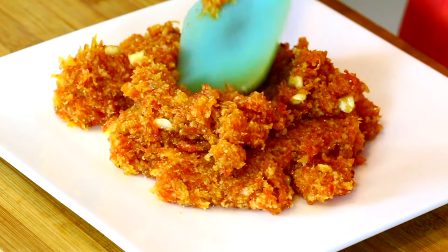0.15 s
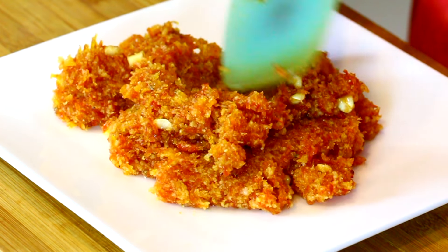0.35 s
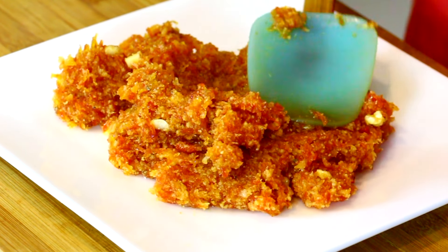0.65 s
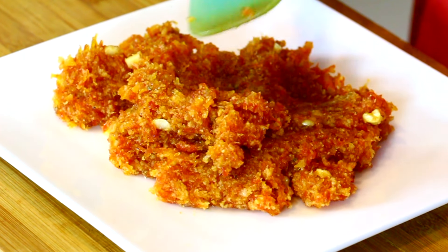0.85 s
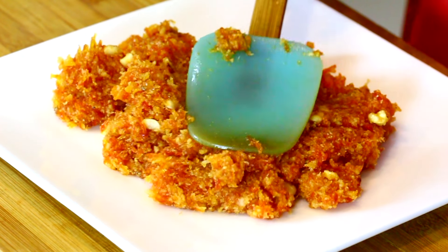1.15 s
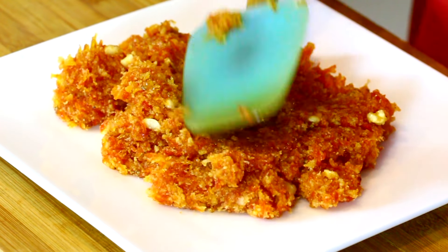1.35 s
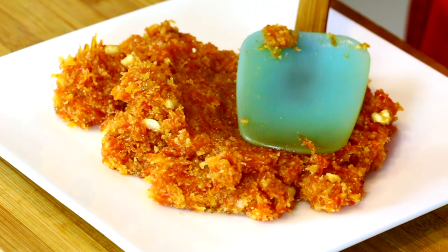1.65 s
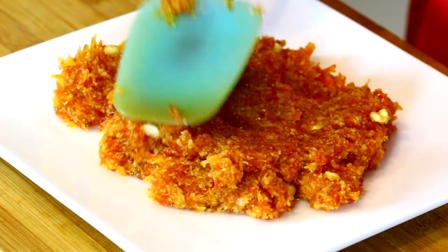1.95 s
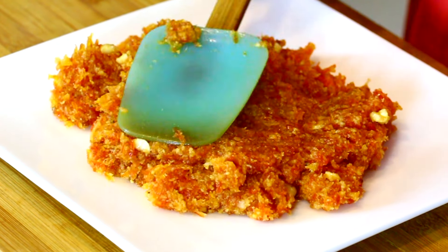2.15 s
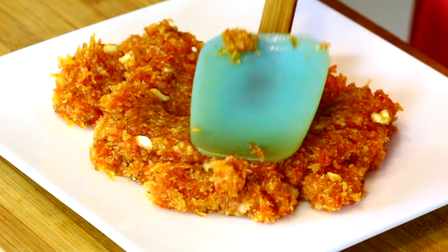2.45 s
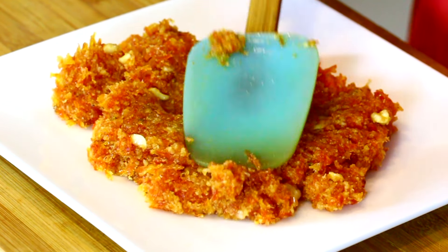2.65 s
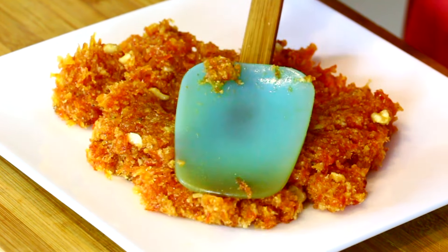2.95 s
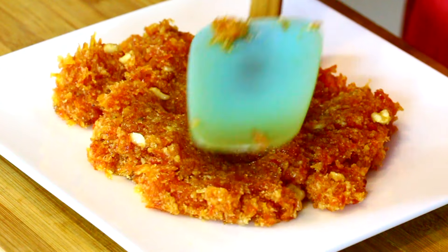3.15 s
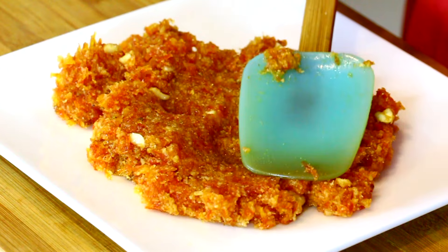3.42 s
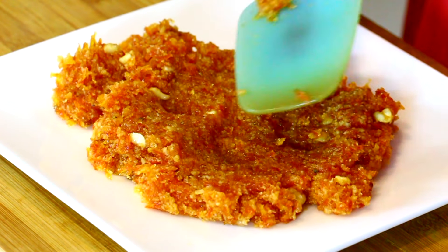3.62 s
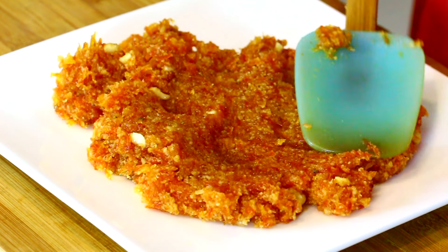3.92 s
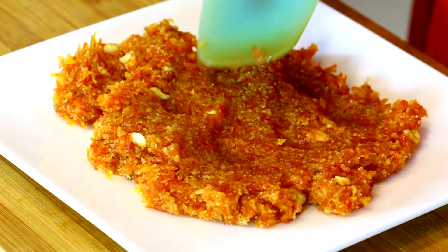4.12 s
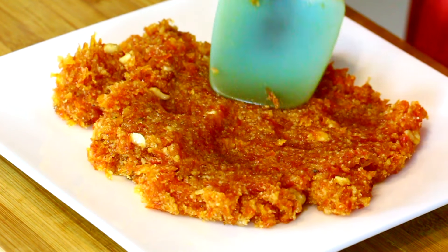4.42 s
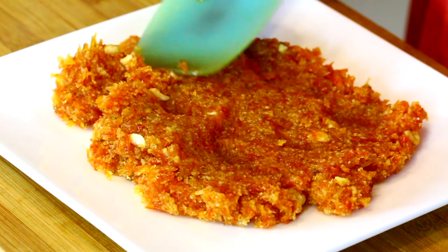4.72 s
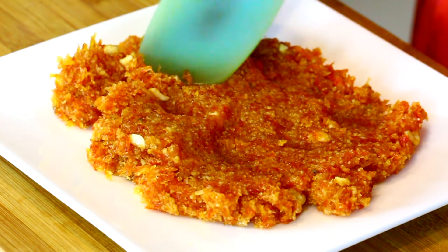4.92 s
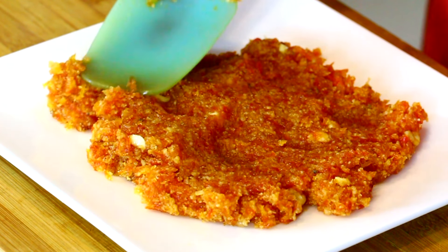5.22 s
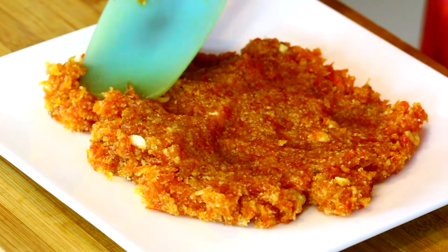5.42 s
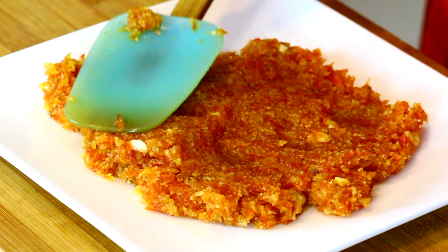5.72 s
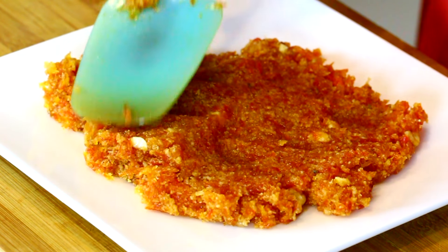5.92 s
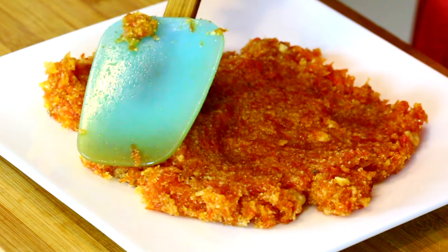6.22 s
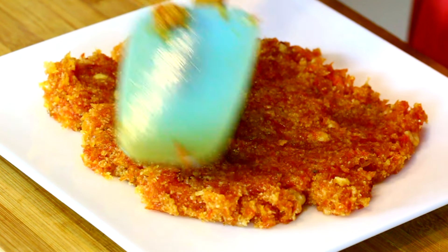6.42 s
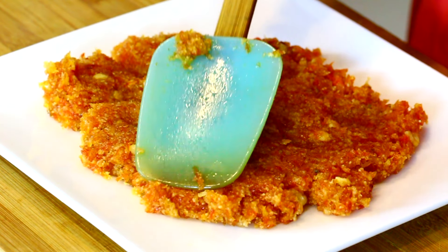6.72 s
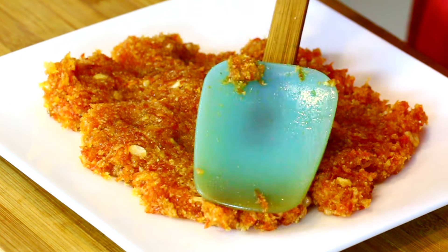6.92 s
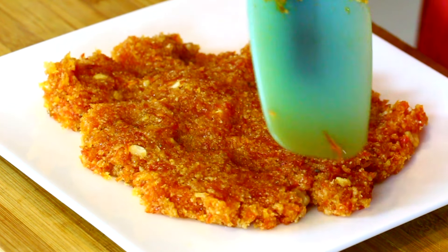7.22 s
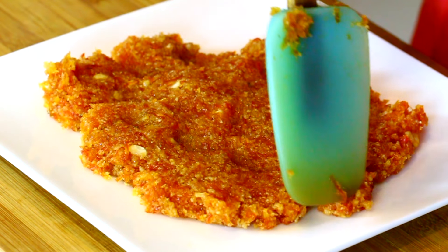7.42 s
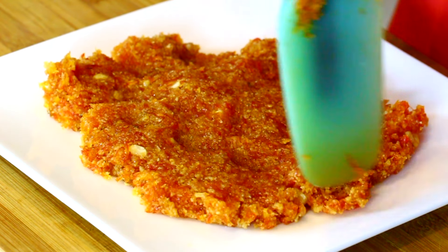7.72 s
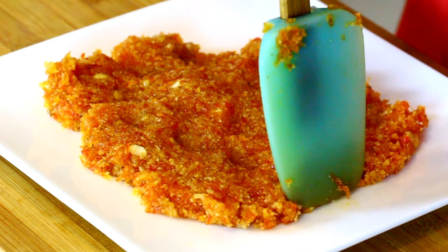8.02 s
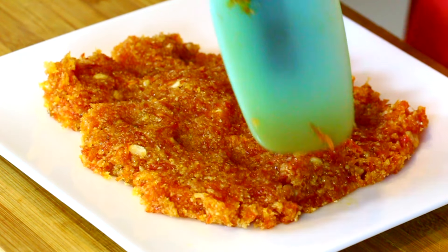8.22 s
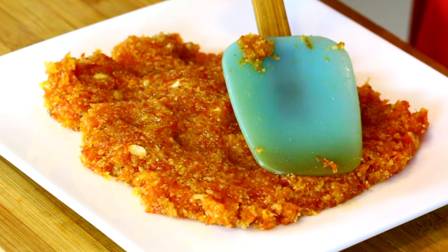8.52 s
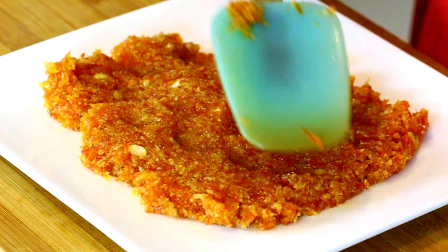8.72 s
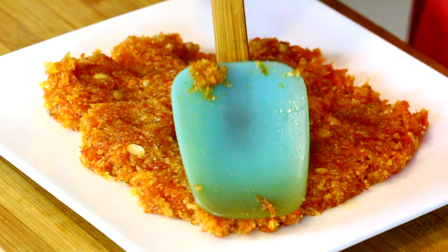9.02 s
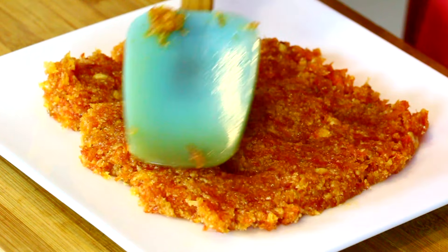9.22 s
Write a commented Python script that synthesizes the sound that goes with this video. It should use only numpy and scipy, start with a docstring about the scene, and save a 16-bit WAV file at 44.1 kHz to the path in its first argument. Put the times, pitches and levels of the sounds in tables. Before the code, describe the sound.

Close up in a small, quiet kitchen, a brief metallic rattle opens, with a faint tone fading after it. A soft blade thumps a plate of tacky food, hollow and short, and peels away with high crackling and popping strands. The strongest knocks come around two to three seconds and at seven. A faint rub precedes a late knock, and crisp snaps finish over steady low room hum.

```python
"""Spatula patting a sticky mixture on a plate

A silicone spatula pats and spreads a sticky mixture on a ceramic plate that rests on a wooden counter.
Its thuds ring damped plate modes over a noisy board shudder; the peeling blade crackles and snaps in tiny pops.
A metal utensil clatters down nearby at the start, as damped modes and bursts of coloured noise.
Faint tones ring and the blade rubs once; a quiet kitchen hums and echoes around a nearly mono image."""
import sys
import numpy as np
from scipy import signal
from scipy.fft import rfft, irfft, next_fast_len
from scipy.io import wavfile
from scipy.ndimage import map_coordinates

SR = 44100
rng = np.random.default_rng(int(sys.argv[2]) if len(sys.argv) > 2 else 0)


def dump_mix(stems):
    """Bounce the given channels to the path in sys.argv[1] as a 16-bit WAV at rate SR."""
    frames = np.atleast_2d(stems).T  # one column per channel
    limited = np.clip(frames, -1, 1)  # hard clip at full scale
    pcm = np.round(limited * 32767).astype(np.int16)
    wavfile.write(sys.argv[1], SR, pcm)


N = 412776

# single sticky strands that snap, loud ones and some faint ones: (t/s, peak level/dB, f/Hz)
SNAPS = [(0.2854, -28, 5500), (0.2907, -30, 4860), (0.5976, -31, 6500), (0.6733, -33, 7400),
         (0.761, -33.5, 5280), (0.827, -32.5, 5300), (0.8647, -28.5, 7600), (1.1785, -29, 5900),
         (1.4981, -26, 7000), (1.5075, -22, 9000), (1.5278, -27.5, 7000), (1.5327, -23, 10200),
         (2.4096, -27, 5540), (2.4125, -23, 5640), (2.4304, -29, 5200), (2.621, -35, 7600),
         (2.8204, -23, 7600), (2.8243, -27, 8850), (2.8454, -25, 6910), (2.8566, -24, 7110),
         (2.863, -30, 5690), (2.875, -28, 7480), (2.883, -18, 6870), (3.2464, -33, 7660),
         (3.2759, -25.5, 7300), (3.288, -18.5, 6600), (3.518, -31.5, 4770), (3.7165, -20.5, 7450),
         (3.9887, -37, 4900), (4.101, -32, 7300), (4.128, -36, 4130), (4.3428, -34, 7800),
         (4.4414, -39, 2800), (4.592, -27.5, 5270), (4.6112, -25, 5660), (4.6187, -27, 9460),
         (5.0097, -37, 5500), (5.091, -34, 2710), (5.5822, -37, 2700), (5.6125, -32, 5600),
         (5.8786, -35.5, 7340), (5.9115, -30, 7660), (6.0304, -27.5, 6900), (6.094, -29, 8100),
         (6.3053, -37, 6020), (6.4875, -30.5, 7600), (6.8986, -31, 9300), (6.9157, -29, 9860),
         (7.1816, -32, 6900), (7.1878, -30, 7540), (8.1671, -41, 3500), (8.632, -34, 7400),
         (8.68, -38, 2800), (8.8199, -31.5, 7400), (9.207, -34, 10000), (9.246, -21, 8200),
         (9.2481, -18, 7700)]


def amp(db):
    """dB to gain."""
    return 10 ** (np.asarray(db) / 20)


def unit(x):
    """Scaled to rms 1."""
    return x / np.sqrt(np.mean(x ** 2) + 1e-20)


def along(points, hz):
    """Reads a curve of (f/Hz, value) points on a log frequency axis."""
    f, v = np.transpose(points)
    return np.interp(np.log(hz + 1), np.log(f + 1), v)


def wobble(rate):
    """A smooth random curve, rate knots a second."""
    knots = rng.standard_normal(int(N * rate / SR) + 4)
    return map_coordinates(knots, [np.arange(N) * rate / SR])


def coloured(x, spectrum):
    """Filters x to a (f/Hz, level/dB) spectrum without lead-in (minimum phase)."""
    m = next_fast_len(len(x) + 8192)
    gain = amp(along(spectrum, np.fft.rfftfreq(4096, 1 / SR)))
    # folding the cepstrum onto positive time gives minimum phase
    cepstrum = irfft(np.log(gain + 1e-6))
    cepstrum[1:2048] *= 2
    cepstrum[2049:] = 0
    impulse = irfft(np.exp(rfft(cepstrum)))
    return irfft(rfft(x, m) * rfft(impulse, m), m)[:len(x)]


def add(track, s, sound):
    """Mixes a sound into the track at time s."""
    part = track[round(s * SR):][:len(sound)]
    part += sound[:len(part)]


def ringing(modes, t, scatter_db, detune):
    """Damped modes, each at a new strength and slightly off pitch; neighbours swing in opposite senses."""
    hz, db, t60 = np.transpose(modes)[:, :, None]
    level_chance, pitch_chance = rng.standard_normal((2, *hz.shape))
    strength = amp(db + scatter_db * level_chance - 60 * t / t60)
    sense = (-1) ** np.arange(len(modes))[:, None]
    swing = np.sin(2 * np.pi * hz * (1 + detune * pitch_chance) * t)
    return np.sum(sense * strength * swing, axis=0)


def clicks(s, gain, hz, cycles):
    """Tiny pops whose envelopes peak at times s: a few cycles that swell and die."""
    t = np.arange(80) / SR
    u = t * hz[:, None] / cycles
    pop = gain[:, None] * u * np.exp(1 - u) * np.sin(2 * np.pi * hz[:, None] * t)
    where = np.round((s - cycles / hz) * SR).astype(int)[:, None] + np.arange(len(t))
    # overlapping pops add up; the spare last bin takes what falls past the end
    return np.bincount(np.clip(where, 0, N).ravel(), pop.ravel(), N + 1)[:N]


def puff(t):
    """One slow swing of squeezed air."""
    swing = t / 0.0065
    return np.sin(swing * 1.74) * swing * np.exp(1 - swing)


def room_tone():
    """Steady hum and hiss, drifting a little."""
    # colour of the tone: (f/Hz, relative level per Hz/dB)
    hum = [(12, -31), (20, -16), (85, 2.5), (197, 0), (618, -5), (3900, -19), (7830, -23), (14500, -29),
           (15700, -34)]
    drift = amp(0.51 * wobble(1.0) + 0.17 * wobble(8.6))
    return amp(-53.5) * drift * unit(coloured(rng.standard_normal(N), hum))


def side_hiss():
    """Faint steady noise, the only difference between the channels."""
    # its colour: (f/Hz, relative level per Hz/dB)
    wide = [(12, -30), (20, 1), (141, -3.5), (1470, -27.5), (4870, -23.5), (15700, -15)]
    return amp(-73) * unit(coloured(rng.standard_normal(N), wide))


def peeling():
    """Tiny strands tear in clumps over a wet hiss; brisker peels tear thinner, higher strands."""
    # the blade peels off the mixture: (middle t/s, crackle level/dB, half length/s)
    peels = [(0.3, -52, 0.035), (0.665, -57, 0.064), (0.875, -51, 0.037), (1.194, -57, 0.049),
             (1.503, -46.5, 0.031), (1.905, -51, 0.028), (2.143, -56.5, 0.02), (2.213, -55.5, 0.022),
             (2.417, -45.5, 0.03), (2.632, -58, 0.014), (2.855, -46.5, 0.041), (3.113, -59.5, 0.021),
             (3.291, -45.5, 0.014), (3.49, -61, 0.053), (3.693, -49, 0.021), (3.961, -57, 0.036),
             (4.123, -49.5, 0.021), (4.352, -48.5, 0.01), (4.44, -56.5, 0.02), (4.6, -49, 0.031),
             (4.9, -60, 0.074), (5.112, -53.5, 0.037), (5.585, -55, 0.05), (5.89, -61, 0.031),
             (6.077, -53, 0.016), (6.485, -56.5, 0.021), (6.918, -55, 0.027), (7.191, -56, 0.025),
             (8.841, -50, 0.027), (9.256, -50, 0.017)]
    # colour of the hiss: (f/Hz, relative level per Hz/dB)
    crackle = [(1180, -44), (2000, -16), (2680, -6), (3950, -20), (7230, -7.5), (10600, -13), (15700, -27)]
    rest_db = -65.5  # a faint crackle never quite stops between peels
    rest_hz, brighter_per_db = 5400, .022  # its middle grain pitch, log pitch rise per dB of peel

    t = np.arange(N) / SR
    level = amp(rest_db)
    for s, db, half in peels:
        level = level + amp(db) * np.exp(-np.abs((t - s) / half) ** 1.67)

    density = 1100 / SR * amp(5 * wobble(70))  # chance of a tear per sample, in clumps
    when = np.flatnonzero(rng.random(N) < density)
    size = amp(-3 * np.log(rng.random(N)[when]))
    brisk_db = 20 * np.log10(level[when]) - rest_db
    pitch_hz = rest_hz * np.exp(brighter_per_db * brisk_db + 0.42 * rng.standard_normal(N)[when])
    pitch_hz = np.clip(pitch_hz, 2400, 12500)
    # thick, low strands ring longer, so they start weaker
    grains = clicks(when / SR, size * (pitch_hz / 7000) ** .45, pitch_hz, cycles=1.25)
    hiss = coloured(rng.standard_normal(N) * amp(5.1 * wobble(90)), crackle)
    return level * unit(unit(grains) + 0.55 * unit(hiss))


def clatter():
    """The utensil bounces to rest: each scraping contact rings the metal and leaves a dull rattle."""
    # bounces: (t/s, relative level/dB, ring against rattle/dB)
    bounces = [(0.0005, -10.5, -0.5), (0.0205, -18, 0.5), (0.0519, -11.5, 3.5), (0.0935, -13.5, 1.5),
               (0.0978, -13, 6), (0.1182, -15.5, 0.5), (0.2849, -33.5, -2.5)]
    # modes of the utensil before detuning: (f/Hz, relative level/dB, t60/s)
    metal = [(599.7, -1, 0.14), (801, -7.5, 0.43), (1075, -7, .08), (1613, 0, 0.048), (2124, -18, 0.49),
             (2590, -7, 0.032), (2993, 1.5, 0.036), (3710, 3.5, 0.023), (4490, -2, 0.023),
             (5260, -4.5, 0.037), (6530, -9, 0.032), (7450, -3.5, 0.031), (8080, -1, .03)]
    # colour of the rattle: (f/Hz, level per Hz/dB)
    rattle_colour = [(24, -63), (40, -16), (77, -17), (267, -22), (499, -12), (823, -4.5), (1320, -9),
                     (3880, -16), (9780, -29), (15700, -49)]

    out, bursts, t = np.zeros(N), np.zeros(N), np.arange(SR // 2) / SR
    for s, db, ring_db in bounces:
        contact = amp(-60 * t[:600] / 0.0051) * rng.standard_normal(600)
        modes = ringing(metal, t, scatter_db=3.0, detune=.03)
        ring = signal.fftconvolve(modes, contact / np.linalg.norm(contact))
        add(out, s, amp(db + ring_db - 13.5) * ring)
        # a quick decay with a weaker, slower one behind it
        dying = amp(-60 * t / 0.018) + 0.28 * amp(-60 * t / 0.39)
        attack = 1 - np.exp(-t / 0.0011)
        add(bursts, s, amp(db) * attack * dying * rng.standard_normal(len(t)))
    rattle = coloured(bursts * amp(1.3 * wobble(165)), rattle_colour)
    return out + amp(16) * rattle


def room(x, step=.4):
    """The kitchen's tail: each frequency dies at its own speed, each step of seconds meets a new tail."""
    # decay of the kitchen: (f/Hz, t60/s)
    kitchen = [(100, 0.81), (500, 0.33), (2000, 0.45), (5000, 0.36), (12000, 0.18)]
    out, size = np.zeros(N), round(step * SR)
    for start in range(0, N, size):
        hz, t, z = signal.stft(rng.standard_normal(SR * 3 // 4), SR, nperseg=256)
        decay = amp(-60 * t / along(kitchen, hz)[:, None])
        tail = signal.istft(z * decay, SR, nperseg=256)[1]
        echo = signal.fftconvolve(x[start:start + size], tail / np.linalg.norm(tail))
        add(out, start / SR + .003, echo)
    return out


def snaps():
    """Each strand lets go in a pop with a lower partial, and a weaker twin comes off the plate."""
    s, db, hz = np.transpose(SNAPS)
    pop = clicks(s, amp(db), hz, cycles=0.87)
    low = clicks(s, amp(db - 28.0), 0.43 * hz, cycles=0.88)
    twin = clicks(s + 0.00077, amp(db - 17.0), 1.03 * hz, cycles=1.6)
    return pop + low + twin


def suction():
    """Air rushes in behind every snapping strand: a low puff of inverted sign."""
    out, t = np.zeros(N), np.arange(SR // 10) / SR
    for s, db, hz in SNAPS:
        add(out, s, -amp(db - 32) * puff(t))
    return out


def pings():
    """Single soft tones that swell and fade, wavering in strength and phase."""
    # faint rings from elsewhere in the kitchen: (t/s, level before swell and waver/dB, f/Hz, t60/s, attack/s)
    tones = [(0.354, -36.5, 675, .34, .001), (0.76, -54, 2140, 1.3, .12)]
    out, t = np.zeros(N), np.arange(SR) / SR
    for s, db, hz, t60, attack in tones:
        waver_db, phase_drift = 5 * wobble(60)[:SR], .7 * wobble(45)[:SR]
        swell = 1 - np.exp(-t / attack)
        tone = np.sin(2 * np.pi * hz * t + phase_drift)
        add(out, s, amp(db + waver_db - 60 * t / t60) * swell * tone)
    return out


def thuds():
    """The blade rings the plate: the harder the thud, the shorter its contact and the brighter its sound."""
    # thuds of the blade as it pats the plate or peels away: (t/s, peak level/dB, hardness/dB)
    blade_thuds = [(0.636, -32.5, -19), (1.239, -46.5, -15), (1.484, -28.5, -8.5), (1.76, -23, -10.5),
                   (1.897, -26.5, -4), (2.424, -18, -10.5), (2.634, -24, -7), (2.855, -36.5, 0),
                   (3.041, -17.5, -1.5), (3.259, -36, 0), (3.466, -26, -7.5), (3.71, -37.5, -2),
                   (5.557, -23, -13.5), (5.951, -35, -22), (6.637, -33, -9), (7.05, -19, -1),
                   (8.058, -25, -1), (8.586, -37, -15), (9.031, -31.5, -7)]
    # modes of the plate on its board before detuning: (f/Hz, relative level/dB, t60/s)
    plate = [(109, -3.5, 0.25), (213, -13.5, 0.11), (327, -2.5, 0.15), (360, -7, 0.15), (409, 9, 0.052),
             (518.5, 0.5, 0.12), (576.5, 2.5, 0.14), (691, -2, 0.1), (798, 11, 0.043), (954, 1.5, 0.056),
             (981, -0.5, 0.14), (1144, 6, 0.049), (1302, -2.5, 0.064), (1530, 1.5, 0.037),
             (1893, -4, 0.055), (2190, -1.5, 0.068), (2210, -12, 0.036), (2470, 4.5, 0.033),
             (3160, -7, 0.036)]
    push_db, push_grows = -37, .6  # air push with a 0 dB thud, its dB per dB of thud
    thud_lag_s = 0.00149  # delay of the thud behind the push

    out, t = np.zeros(N), np.arange(SR // 3) / SR
    # no deep bass from a small plate, no treble from a soft blade
    band = signal.butter(3, [200, 3300], "band", fs=SR)
    for s, db, hard_db in blade_thuds:
        contact_s = 0.00047 * amp(-.7 * hard_db)
        u = t[:900] / contact_s
        force = u * np.exp(-4 * u)
        # the board under the plate adds a dense shudder between the modes
        shudder = amp(14.5) * amp(-60 * t / 0.065) * rng.standard_normal(len(t))
        modes = ringing(plate, t, scatter_db=2.0, detune=0.013)
        thud = signal.lfilter(*band, signal.fftconvolve(modes + shudder, force))
        add(out, s + thud_lag_s, amp(db) * thud / np.abs(thud).max())
        add(out, s, amp(push_db + push_grows * db) * puff(t))  # air pushed by the blade
    return out


def rub():
    """The blade's edge slides briefly along the plate: a swell of fluttering coloured noise."""
    # colour of the rub: (f/Hz, relative level per Hz/dB)
    rub_colour = [(600, -30), (900, 2), (1150, -8), (1600, -3), (2300, -25)]
    middle_s, half_s = 7.92, 0.086
    stroke = np.exp(-((np.arange(N) / SR - middle_s) / half_s) ** 4)
    flutter = rng.standard_normal(N) * amp(3 * wobble(60))
    noise = coloured(flutter, [(20, -90), *rub_colour, (9000, -90)])
    return amp(-59.5) * stroke * unit(noise)


def scene():
    """All sources arrive alike at both channels; only a faint hiss differs."""
    plate_hits, metal_hits = thuds(), clatter()
    sticky = snaps() + peeling()
    room_send = amp(-6.0) * plate_hits + amp(-13.5) * sticky + amp(-7) * metal_hits
    mid = plate_hits + sticky + metal_hits + pings() + suction() + rub() + room(room_send) + room_tone()
    side = side_hiss()
    return np.array([mid + side, mid - side])


def record(dry):
    """A steep band limit keeps nothing from 15870 Hz up."""
    m = next_fast_len(N + 8192)
    passed = np.fft.rfftfreq(m, 1 / SR) < 15870
    return irfft(rfft(dry, m) * passed, m)[:, :N]


dry = scene()
out = record(dry)
dump_mix(out)
```